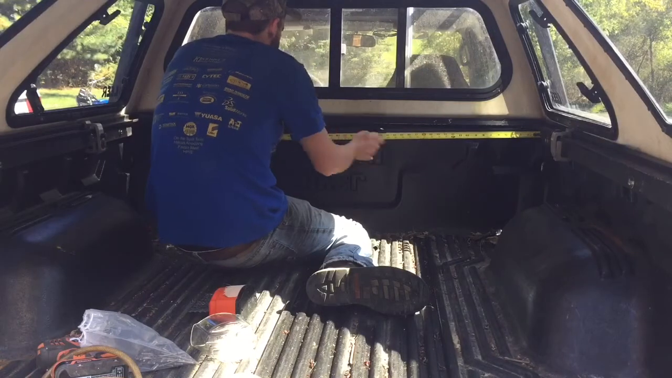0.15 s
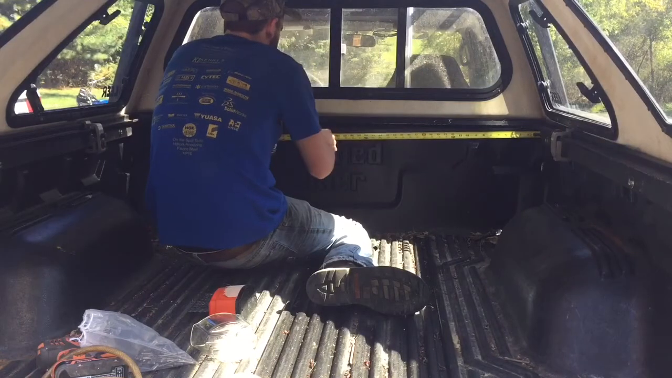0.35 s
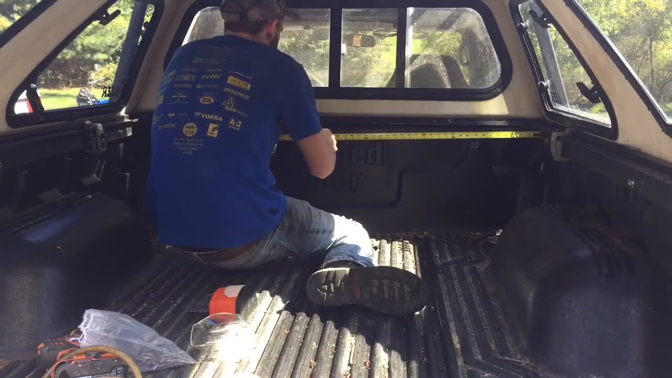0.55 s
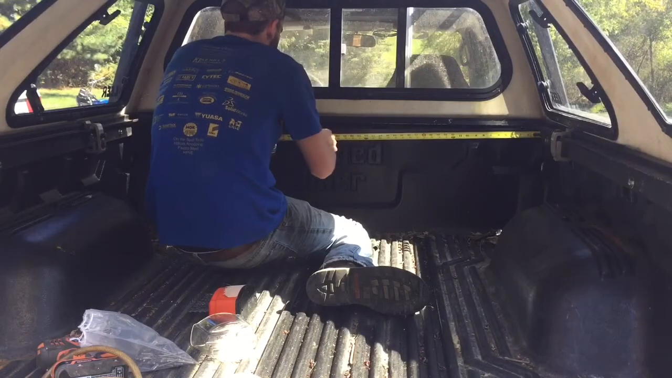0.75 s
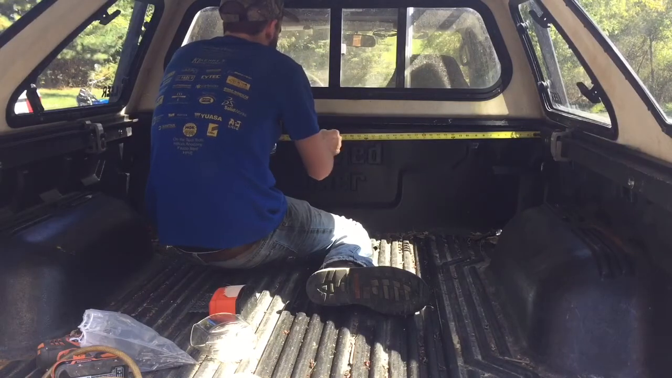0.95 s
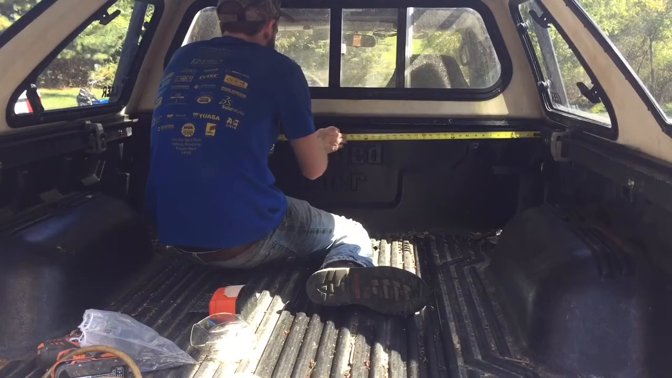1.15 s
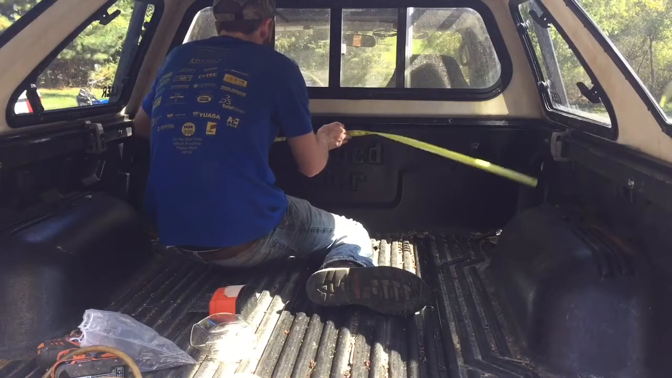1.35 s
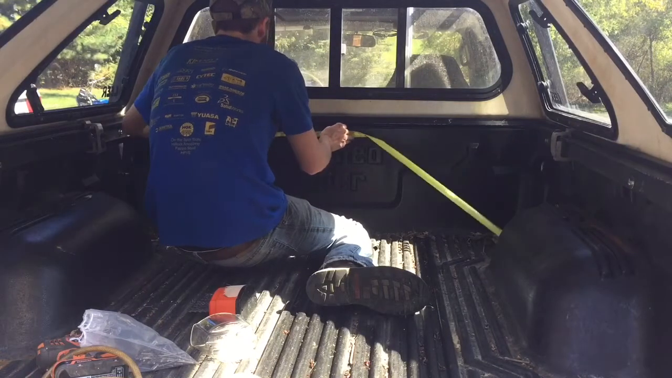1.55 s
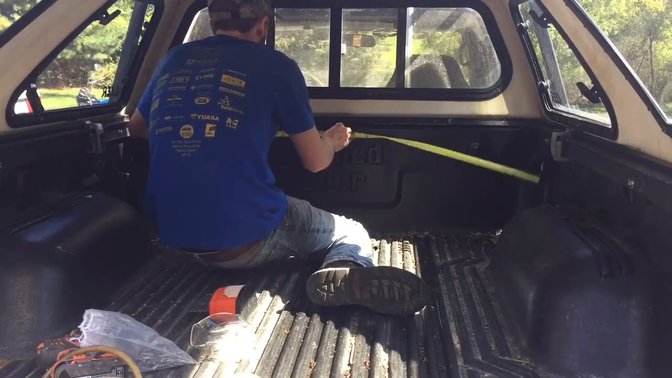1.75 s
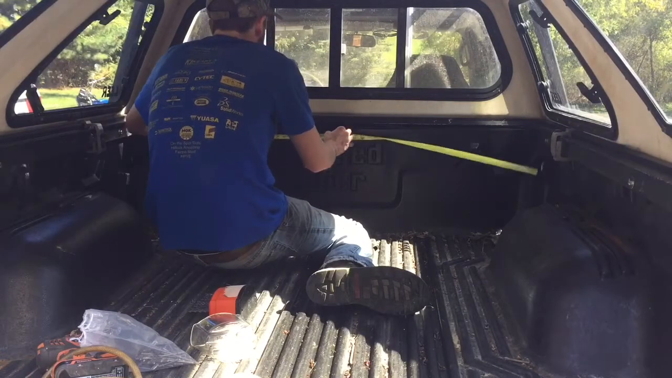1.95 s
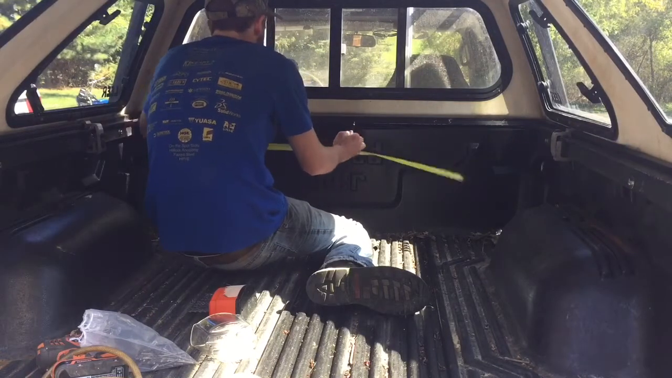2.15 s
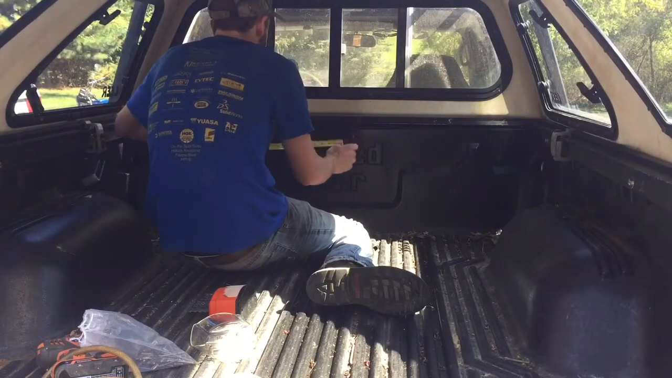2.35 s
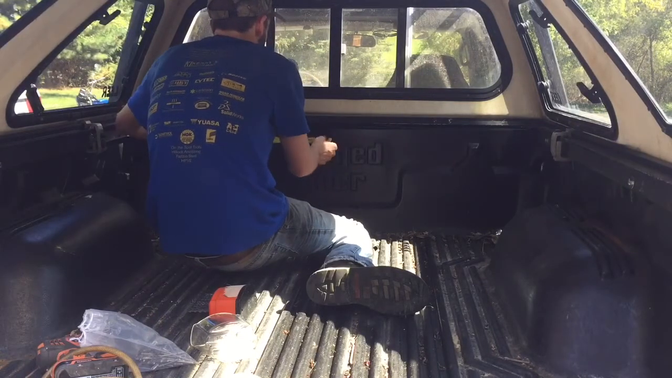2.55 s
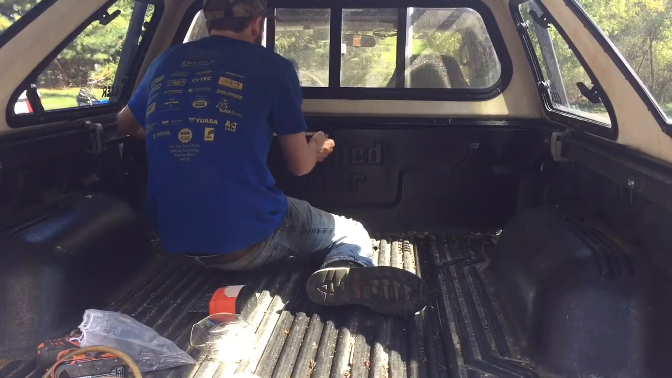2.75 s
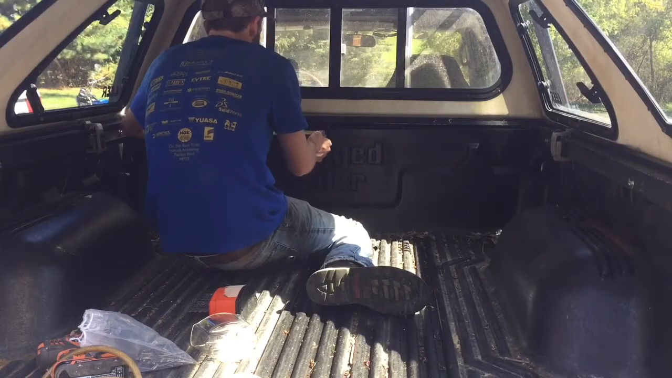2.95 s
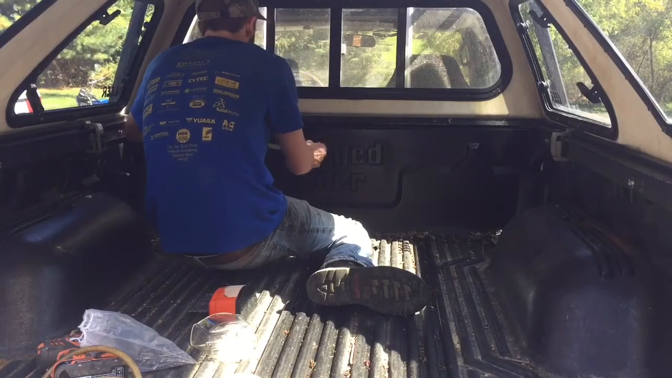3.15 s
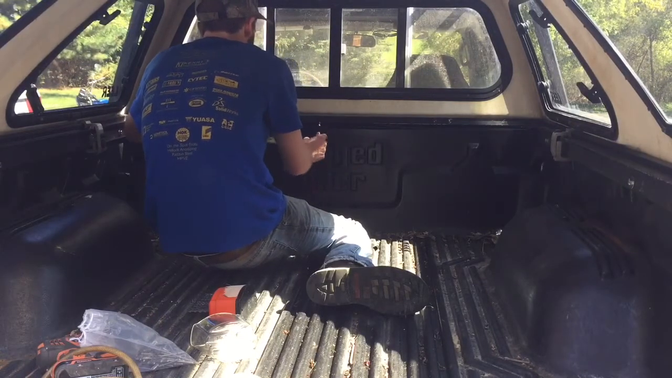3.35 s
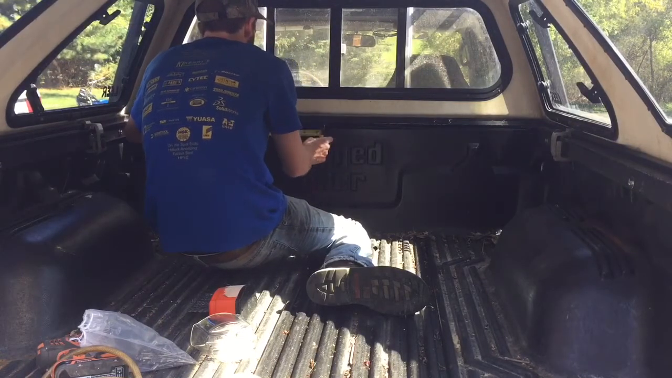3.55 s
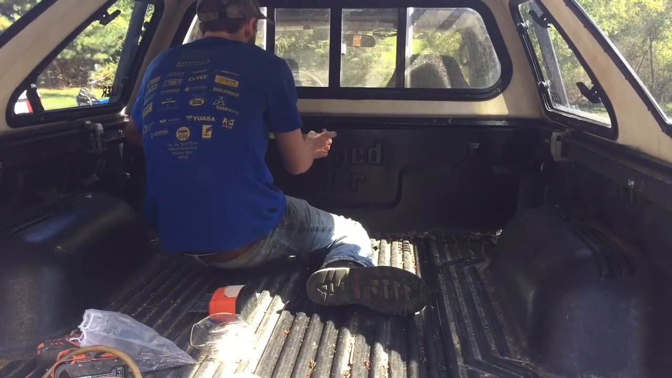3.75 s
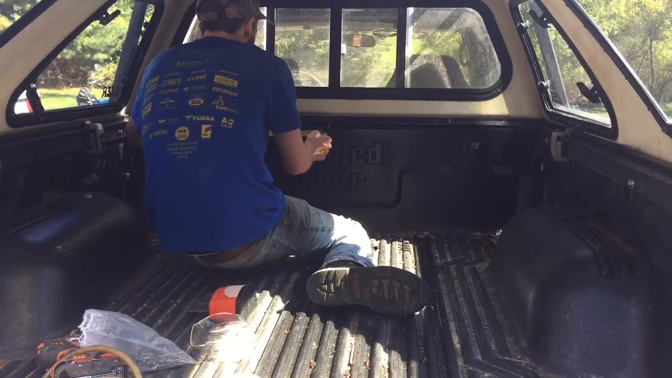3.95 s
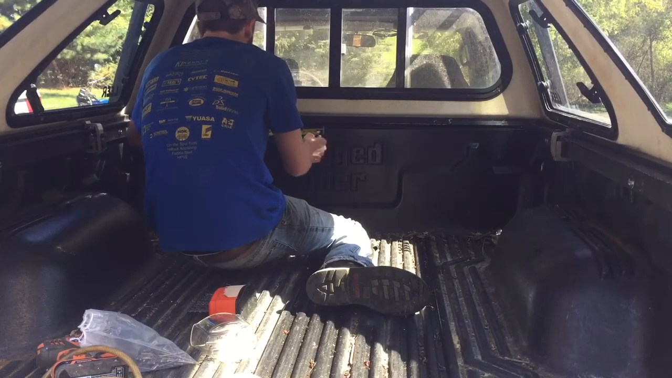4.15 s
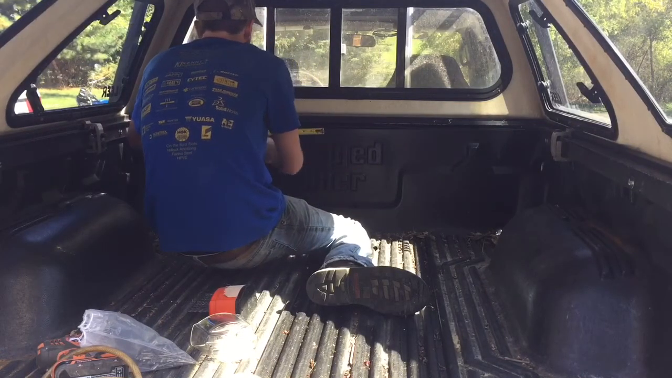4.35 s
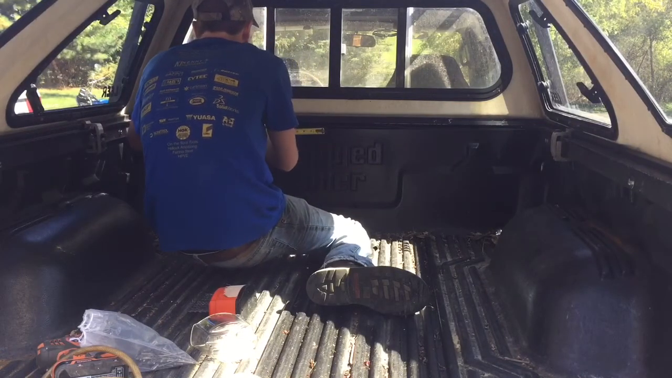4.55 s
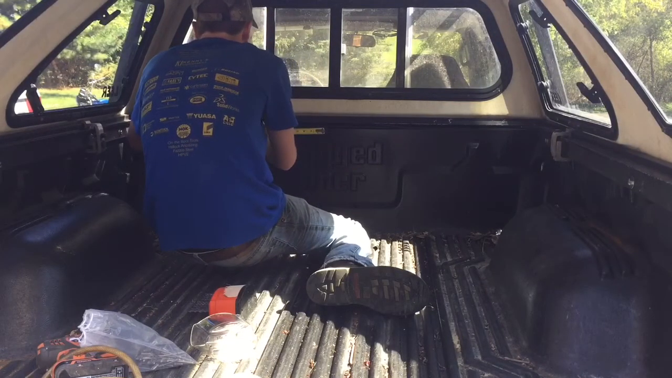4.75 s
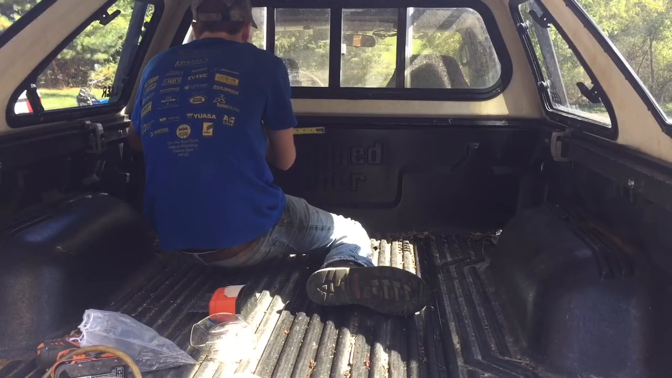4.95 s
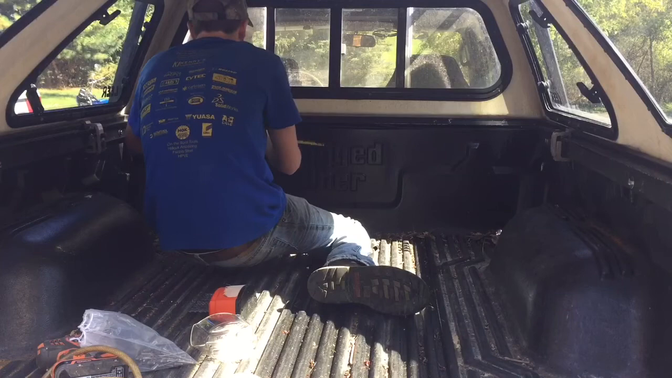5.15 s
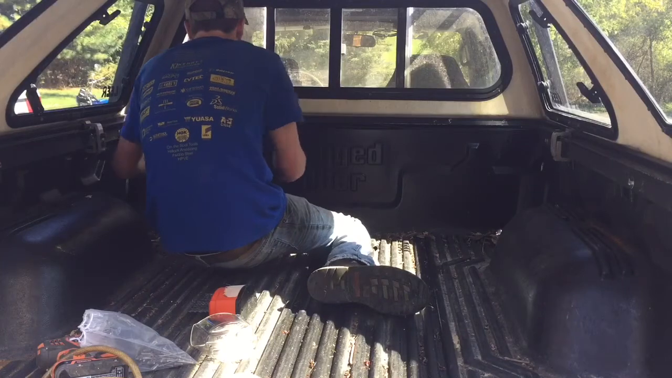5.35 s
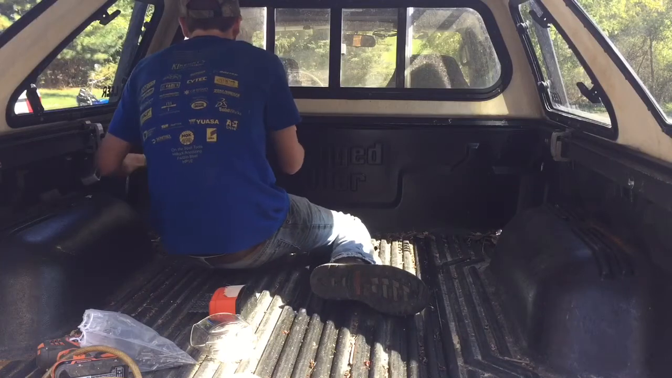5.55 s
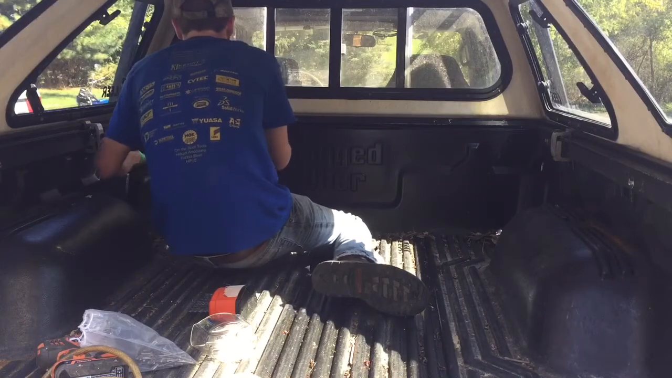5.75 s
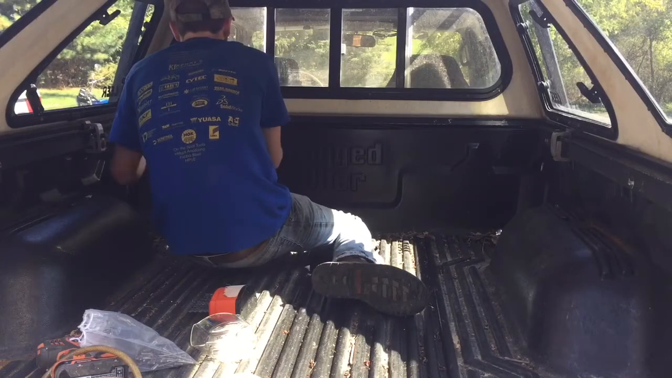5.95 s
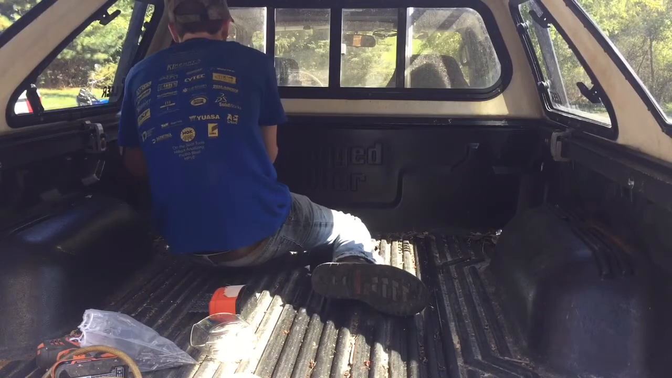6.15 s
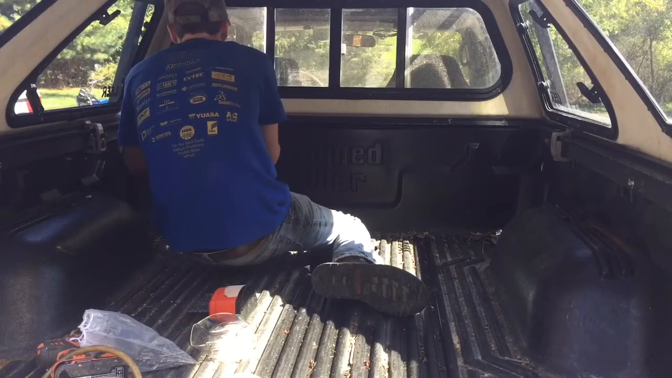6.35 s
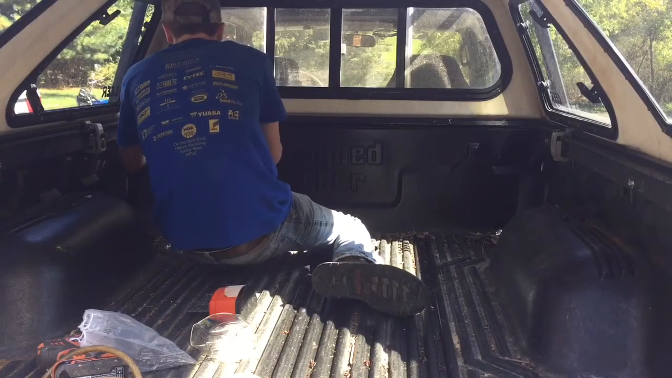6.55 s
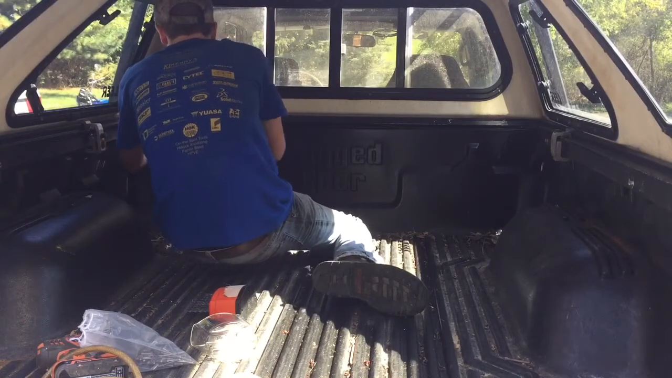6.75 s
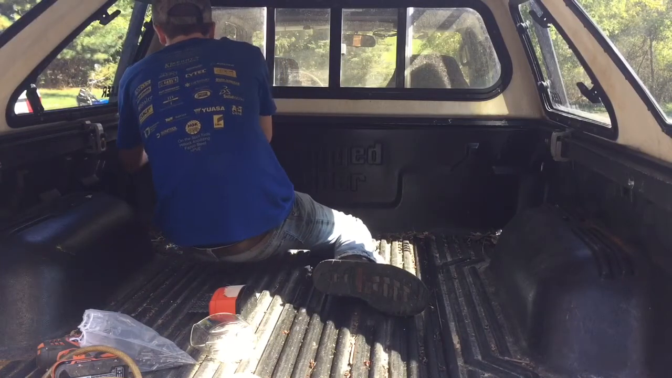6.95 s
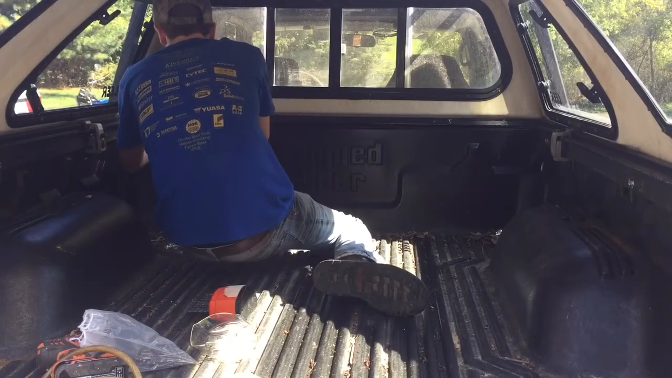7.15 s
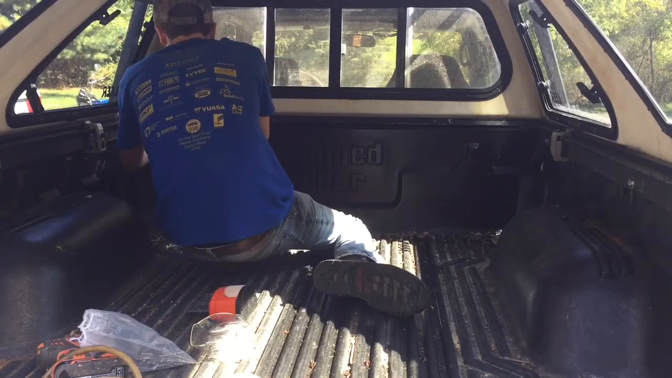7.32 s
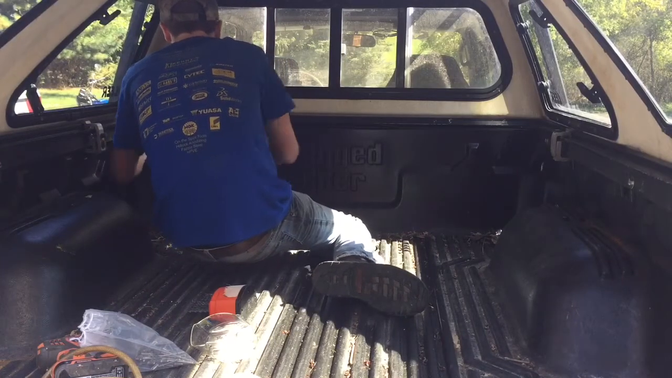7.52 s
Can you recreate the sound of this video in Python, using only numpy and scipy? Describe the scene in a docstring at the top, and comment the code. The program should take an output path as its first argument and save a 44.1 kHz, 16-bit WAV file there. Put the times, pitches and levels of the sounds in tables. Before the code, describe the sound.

In a small enclosed space, a metal tape measure slides in, clattering against plastic, snaps shut and is set down.

```python
"""Faint rubs and knocks over outdoor noise: under the canopy of a pickup bed, a steel tape measure is
unhooked. Its spring draws the blade in with a friction hiss, and the hook clacks on the plastic liner.
Fed in by hand, the blade knocks and scrapes until the hook snaps home and shakes the coil; then the case
is set down. These contacts excite resonances of blade, case and canopy, while the hand holding the
microphone adds soft low bumps."""
import sys
import numpy as np
from scipy import signal
from scipy.io import wavfile

SR = 44100
rng = np.random.default_rng(int(sys.argv[2]) if len(sys.argv) > 2 else 0)


def materialize(psi):
    """Save the field psi as 16-bit PCM at rate SR to the path in sys.argv[1].

    A 1-D psi becomes a single channel; in a 2-D psi each row is a channel.
    """
    bounded = np.clip(np.atleast_2d(psi).T, -1, 1)
    quanta = np.round(bounded * 32767).astype(np.int16)
    wavfile.write(sys.argv[1], SR, quanta)


N = 334542
TIME = np.arange(N) / SR
EDGES = np.geomspace(25, 17500, 27)   # band edges [Hz]
CENTRES = np.sqrt(EDGES[1:] * EDGES[:-1])

# dull knocks of blade and hands: (time [s], contact [s], level [dB], treble [dB], spot pitch [Hz])
KNOCKS = [(0.066, 0.0031, -68.5, -4, 616), (0.785, 0.0013, -61, 16.5, 675),
          (0.823, 0.0041, -62.5, -10, 240), (0.946, 0.0043, -59.5, -24, 840), (1.788, 0.002, -64, 3, 346),
          (1.994, 0.0013, -46.5, -22, 540), (2.197, 0.0005, -26, 9.5, 1846), (2.522, 0.0012, -23, 3, 1302),
          (2.613, 0.0022, -32.5, -4.5, 1260), (2.713, 0.0047, -29.5, -3.5, 630),
          (2.788, 0.004, -47, -14, 686), (2.82, 0.0086, -33, -11, 650), (2.917, 0.0051, -32.5, -4.5, 620),
          (3.068, 0.0019, -25, 2.5, 680), (3.148, 0.0094, -34, -14, 593), (3.17, 0.00068, -26, 4.5, 1263),
          (3.23, 0.0012, -26, 4, 463), (3.34, 0.0015, -28, -19.5, 587), (3.375, 0.0004, -34.5, -15.5, 584),
          (3.444, 0.006, -30.5, -18, 570), (3.495, 0.003, -23, 5.5, 617), (3.546, 0.0041, -29.5, -6.5, 917),
          (3.579, 0.0016, -27, -0.5, 574), (3.638, 0.0048, -34, -6.5, 914), (3.894, .001, -36.5, -1.5, 646),
          (3.986, 0.015, -43.5, -8.5, 1986), (4.16, 0.0032, -32.5, 1, 558), (4.92, 0.0043, -42.5, 2, 510),
          (4.966, 0.0028, -37.5, -3.5, 485), (5.036, 0.0032, -40.5, -2.5, 454),
          (5.239, 0.0031, -29, -11.5, 2035), (5.272, 0.0028, -40, -8, 1370), (5.298, 0.0017, -28, 2, 2040),
          (5.301, 0.0027, -30, -14, 638), (6.125, 0.0036, -38, -1, 2860), (6.357, 0.0046, -55, 1.5, 1030),
          (6.51, 0.0041, -66.5, -9.5, 907), (7.194, 0.0027, -63.5, 16, 655)]
# spectrum of a steel contact: (frequency [Hz], density [dB])
CLICK_SPECTRUM = [(110, -18.5), (250, -17), (600, -18.5), (1300, -11), (2000, -6.5), (2900, -7), (4600, 1),
                  (7000, 0.5), (10000, -0.5), (15500, -4.5)]
# spectrum of sliding friction: (frequency [Hz], density [dB])
SLIDE_SPECTRUM = [(110, -9.5), (220, -5), (350, 4), (550, -3), (900, 2.5), (1300, -6.5), (2200, -3.5),
                  (4500, -4.5), (8000, -14), (12000, -14.5), (15500, -16.5)]
# reverberation under the canopy: (frequency [Hz], T60 [s])
CANOPY_T60 = [(200, 0.24), (600, 0.18), (1500, 0.14), (4000, 0.087), (9000, 0.07), (16000, 0.081)]


def from_db(db):
    """Amplitude ratio of a level in decibels."""
    return 10 ** (np.asarray(db) / 20)


def rms_one(x):
    """Normalisation of each row to unit power."""
    return x / np.sqrt(np.mean(x ** 2, axis=-1, keepdims=True) + 1e-20)


def at_bands(points):
    """Interpolation over log frequency at the band centres, as a column."""
    hz, value = np.transpose(points)
    return np.interp(np.log(CENTRES), np.log(hz), value)[:, None]


def split(pair):
    """Filter bank of unit-power bands; two signals alternate, so neighbours are uncorrelated."""
    bank = [signal.butter(2, edges, "band", fs=SR, output="sos") for edges in zip(EDGES, EDGES[1:])]
    return rms_one(np.array([signal.sosfilt(band, pair[k % 2]) for k, band in enumerate(bank)]))


def colour(spectrum, bass_db=0, treble_db=0):
    """Spectral shaping: band gains of unit total power, then shelved at both ends."""
    gain = from_db(at_bands(spectrum)) * np.sqrt(np.diff(EDGES))[:, None]
    shelves = at_bands([(700, bass_db), (1500, 0), (3500, 0), (8000, treble_db)])
    return gain / np.linalg.norm(gain) * from_db(shelves)


def resonate(x, modes):
    """Resonance: each mode scales its own narrow band."""
    for hz, width_hz, db in modes:
        b, a = signal.iirpeak(hz, hz / width_hz, fs=SR)
        x = signal.lfilter(a + (from_db(db) - 1) * b, a, x)
    return x


def add(out, start_s, sound):
    """Superposition of a sound from a given time on."""
    i = max(0, round(start_s * SR))
    out[i:i + len(sound)] += sound[:N - i]


def stroke(middle_s, half_s):
    """Envelope of a hand movement: the samples it covers and its rounded swell."""
    near = np.flatnonzero(np.abs(TIME - middle_s) < 2 * half_s)
    return near, np.exp(-.5 * ((TIME[near] - middle_s) / half_s) ** 4)


def outdoors(level_db):
    """Stationary background noise: distant rumble and thin hiss."""
    # outdoor spectrum: (frequency [Hz], density [dB])
    spectrum = [(30, -46.5), (58, -24), (81, 3.5), (153, 1), (227, 1.5), (273, -7.5), (374, -2), (526, -9),
                (666, -6.5), (1130, -16.5), (1280, -11), (4650, -20.5), (14800, -26), (16000, -26)]
    # steady bands of hiss: (frequency [Hz], width [Hz], gain [dB])
    hiss_bands = [(5503, 150, 6), (13170, 1100, 4.5)]
    air = (split(rng.standard_normal((2, N))) * colour(spectrum)).sum(0)
    return from_db(level_db) * resonate(air, hiss_bands)


def rubbing(width_octaves, sink_octaves):
    """Friction noise in one broad resonance, which sinks as the hand slows."""
    # rubs of hands and cloth: (middle [s], half length [s], resonance [Hz], level [dB])
    rubs = [(0.013, 0.028, 1100, -63), (0.142, 0.022, 600, -63), (1.07, 0.015, 653, -54),
            (1.094, 0.031, 295, -52), (1.367, 0.076, 270, -56.5), (2.364, 0.038, 346, -58),
            (4.217, 0.033, 193, -50.5), (5.346, 0.016, 1200, -36.5), (5.375, 0.061, 282, -48.5),
            (6.265, 0.032, 544, -49.5), (6.315, 0.029, 250, -60.5), (7.409, 0.054, 850, -71)]
    out, noise = np.zeros(N), split(rng.standard_normal((2, N)))
    for s, half_s, middle_hz, db in rubs:
        near, swell = stroke(s, half_s)
        hz = middle_hz * 2 ** (sink_octaves * np.interp(TIME[near], [s - half_s, s + half_s], [.5, -.5]))
        gain = 1 / (1 + (np.log2(CENTRES[:, None] / hz) / width_octaves) ** 4)
        out[near] += from_db(db) * swell * rms_one((noise[:, near] * gain).sum(0))
    return out


def impacts(rows, spectrum, crack_t60, early_db, late_db, late_t60, rise_power=0.7):
    """Impact noise: a brief crack, near reflections and a faint late ring decay exponentially."""
    out, t = np.zeros(N), TIME[:SR // 4]
    noise = split(rng.standard_normal((2, N // 2)))
    crack = from_db(-60 * t / crack_t60)
    early = from_db(early_db - 60 * t / at_bands(CANOPY_T60))
    late = from_db(late_db - 60 * t / late_t60)
    decay = np.sqrt(crack ** 2 + early ** 2 + late ** 2)
    offsets = rng.integers(0, N // 2 - len(t), len(rows))
    for (s, contact_s, db, bass_db, treble_db), i in zip(rows, offsets):
        since_contact = (np.maximum(t - contact_s, 0) * SR).astype(int)
        force = np.minimum(t / contact_s, 1) ** rise_power   # a hard contact builds up at once
        bands = noise[:, i:i + len(t)] * decay.take(since_contact, axis=1)
        add(out, s, from_db(db) * force * (colour(spectrum, bass_db, treble_db)[:, 0] @ bands))
    return out


def free_length(s):
    """Metres of blade free to vibrate at a given time."""
    # blade out of the case: (time [s], length [m])
    blade_out = [(1.9, 2.03), (2.3, 0.3), (2.85, 1.82), (3.05, 0.12), (5.4, 0.48)]
    return np.interp(s, *np.transpose(blade_out))


def contact_bass(s, db, db_per_m=5.5, firm_db=-30):
    """Bass shelf in dB: a long free blade and a light touch both favour low frequencies."""
    return db_per_m * free_length(s) + 0.1761 * (firm_db - db)


def with_bass(rows, bass_db):
    """Impacts on the blade, each with the bass that free length and force give it."""
    return [(s, contact_s, db, bass_db + contact_bass(s, db), treble_db)
            for s, contact_s, db, treble_db, *_ in rows]


def blade_knocks():
    """Damped impacts of the flexing blade and the hands, with their chatter."""
    # spectrum of a dull contact: (frequency [Hz], density [dB])
    spectrum = [(110, -29), (220, -13), (350, -9.5), (550, -5.5), (900, -1.5), (1300, -4.5), (2200, -2),
                (4500, -5.5), (7000, -10.5), (11000, -13.5), (15500, -20.5)]
    touches = with_bass(KNOCKS + chatter(), bass_db=-3.5)
    return impacts(touches, spectrum, crack_t60=0.05, early_db=-4.5, late_db=-19.5, late_t60=0.18)


def spot_rings(gain_db, t60, rise_s):
    """Free vibration of the struck spot gives each knock a short hollow pitch."""
    out, t = np.zeros(N), TIME[:SR // 4]
    for s, contact_s, db, _, hz in KNOCKS:
        swell = np.minimum(t / (contact_s + rise_s), 1)
        decay = from_db(db + gain_db - 60 * (t - contact_s) / t60)
        add(out, s, swell * decay * np.sin(2 * np.pi * hz * t))
    return out


def scrape_power(bass_db=-10, rasp_db=6.5, rasp_octaves=0.49, drag_delay_s=0.039, drag_half_s=0.013):
    """Band power of scraping friction, lifted around one resonance of the bent blade."""
    # scrapes of the hand-fed blade, and of the case as it is put down:
    # (middle [s], half length [s], level [dB], treble [dB], resonance [Hz])
    scrapes = [(1.25, 0.039, -67.5, 10, 800), (2.07, 0.011, -49.5, -8, 616), (2.6, 0.043, -43, -4, 2200),
               (2.644, 0.037, -33.5, -3, 2300), (2.756, 0.021, -47, -28, 627),
               (2.965, 0.021, -58, -33, 620), (3.092, 0.022, -34, -2.5, 1150),
               (3.164, 0.003, -34, -1, 1350), (3.228, 0.0075, -30, -9, 1320),
               (3.39, 0.056, -50.5, -12, 620), (3.603, 0.0086, -28, -5, 634),
               (3.675, 0.025, -38.5, -2.5, 2080), (3.823, 0.0052, -35, -12.5, 2080),
               (3.869, 0.014, -30.5, -4.5, 750), (4.089, 0.0081, -41, -17, 656),
               (4.336, 0.0064, -52.5, -19, 1100), (5.203, 0.028, -39.5, -5.5, 660),
               (5.335, 0.0067, -29.5, -3, 1280), (6.25, 0.028, -57.5, -7.5, 1290),
               (6.345, 0.013, -60, 0, 1700), (7.56, 0.029, -38, -5, 550)]
    # after each knock the blade drags on, weaker and duller
    drags = [(s + drag_delay_s, drag_half_s, db - 31.5, treble_db - 11, hz)
             for s, _, db, treble_db, hz in KNOCKS]
    power = np.zeros((len(CENTRES), N))
    for s, half_s, db, treble_db, hz in scrapes + drags:
        near, swell = stroke(s, half_s)
        peak = np.exp(-.5 * (np.log2(CENTRES[:, None] / hz) / rasp_octaves) ** 2)
        tone = colour(SLIDE_SPECTRUM, bass_db + contact_bass(s, db), treble_db)
        power[:, near] += (from_db(db + rasp_db * (peak - .5)) * swell * tone) ** 2
    return power


def flutter(per_s, depth_db, hold=16):
    """Random amplitude modulation, band by band: as the blade flexes, different bands speak."""
    knots = from_db(depth_db * rng.standard_normal((len(CENTRES), N // 200)))
    gains = rms_one(np.array([np.interp(TIME[::hold] * per_s, np.arange(len(k)), k) for k in knots]))
    return np.repeat(gains, hold, axis=1)[:, :N]


def catches(per_s, depth_db):
    """Stick-slip modulation: the blade holds and lets go, in all bands at once."""
    knots = from_db(depth_db * np.clip(rng.standard_normal(N // 50), -2, 2))
    return rms_one(np.interp(TIME * per_s, np.arange(len(knots)), knots))


def sliding(slips_per_s, spread_db, snags_per_s, snag_db, gain_db):
    """Stick-slip friction in fingers and case mouth: tiny slips, and sharp ticks as the edge snags."""
    sizes = from_db(spread_db * np.minimum(rng.exponential(1, (2, N)), 4)) * rng.choice([-1, 1], (2, N))
    snags = from_db(snag_db) * rms_one(rng.uniform(-1, 1, N) * (rng.random(N) < snags_per_s / SR))
    slips = rms_one(sizes * (rng.random((2, N)) < slips_per_s / SR))
    friction = split(snags + slips) * flutter(per_s=70, depth_db=1.5) * catches(per_s=220, depth_db=4)
    return from_db(gain_db) * (friction * np.sqrt(scrape_power() + retraction_power())).sum(0)


def canopy_echo(dry):
    """Reverberation of the small enclosure, mixed equally with the direct sound; bass lasts longest."""
    t = TIME[:SR // 3]
    bands = split(rng.standard_normal((2, len(t)))) * from_db(-60 * t / at_bands(CANOPY_T60))
    tail = (rms_one(bands) * np.sqrt(np.diff(EDGES))[:, None]).sum(0)
    wet = signal.fftconvolve(dry, tail / np.linalg.norm(tail))[:N]
    return (dry + wet) / np.sqrt(2)


def hook_clicks():
    """Hard impacts of the steel hook and blade tip give bright, fast-decaying clicks."""
    # steel contacts: (time [s], contact [s], level [dB], treble [dB])
    clicks = [(1.052, 0.0049, -55.5, -2.5), (1.292, 0.0068, -33, 6.5), (1.3235, 0.004, -30.5, -1.5),
              (1.391, 0.0036, -39, -6), (2.381, 0.0022, -54, 17), (2.4, 0.0018, -53, 16.5),
              (2.487, 0.011, -60.5, 14), (5.431, 0.0073, -23.5, -4.5), (5.896, .002, -63, 10.5)]
    touches = with_bass(clicks, bass_db=-2)
    return impacts(touches, CLICK_SPECTRUM, crack_t60=0.02, early_db=1, late_db=-30.5, late_t60=0.43)


def retraction_power(gain_db=-7.5, edge_s=0.0091, middling_db=-44.5):
    """Band power of friction as the spring pulls the blade in: fast runs are louder, slow ones rumble."""
    # free runs, with speed given as the level of the hiss: (bass [dB], [(time [s], level [dB])])
    runs = [ (2, [(1.305, -36.5), (1.335, -38), (1.398, -51), (1.42, -62.5), (1.485, -57)]),
            (-10.5, [(1.515, -59), (1.545, -63), (1.558, -48), (1.578, -47), (1.625, -54.5)]),
            (-2, [(1.965, -64), (2.0, -57.5), (2.11, -53), (2.13, -40.5), (2.162, -30.5), (2.19, -45),
            (2.25, -47.5)]), (-9.5, [(2.32, -47.5), (2.37, -52.5), (2.435, -56.5)]), ]
    power = np.zeros((len(CENTRES), N))
    for bass_db, run in runs:
        s, db = np.transpose(run)
        gate = np.interp(TIME, [s[0] - edge_s, s[0], s[-1], s[-1] + edge_s], [0, 1, 1, 0])
        near = np.flatnonzero(gate)
        speed_db = np.interp(TIME[near], s, db)
        rumble_db = at_bands([(700, 0.34), (1500, 0)]) * (middling_db - speed_db)
        tone = colour(SLIDE_SPECTRUM, bass_db + 4, treble_db=16.5)
        power[:, near] += (gate[near] * from_db(gain_db + speed_db + rumble_db) * tone) ** 2
    return power


def chatter(count=2, gap_s=0.027, contact_s=0.001294, slack_from_s=1.3):
    """Uneven, weaker rebounds of the slack blade after a knock; a longer blade loses less at each."""
    rows = []
    for (s, _, db, treble_db, _), gaps in zip(KNOCKS, rng.uniform(0.39, 1.2, (len(KNOCKS), count))):
        loss_db = 26 - 9.5 * free_length(s)
        if s > slack_from_s:   # the blade is taut until it is unhooked
            rows += [(s + gap_s * elapsed, contact_s, db - k * loss_db, treble_db - 1)
                     for k, elapsed in enumerate(np.cumsum(gaps), 1)]
    return rows


def canopy_booms(hz, rise_s):
    """The lowest mode of the canopy swells and fades as the swaying blade leans on the liner."""
    # sways of the blade: (time [s], peak level [dB])
    sways = [(2.131, -50.5), (2.291, -46.5), (2.53, -46), (2.74, -54), (3.149, -51), (3.63, -44),
             (3.91, -52)]
    out, t = np.zeros(N), TIME[:SR // 3]
    age = t / rise_s
    for s, db in sways:
        add(out, s, from_db(db) * (age * np.exp(1 - age)) ** 2 * np.sin(2 * np.pi * hz * t))
    return out


def hook_slams():
    """The hook whips against the bed liner and bounces once; the impacts excite the liner's modes."""
    # landing and bounce: (time [s], contact [s], level [dB], treble [dB])
    slams = [(2.258, .0024, -9.5, -3.5), (2.2795, 0.001, -17, -5.5)]
    # modes of the liner: (frequency [Hz], width [Hz], gain [dB])
    liner_modes = [(934, 40, 7), (1386, 130, 8.5)]
    cracks = impacts(with_bass(slams, bass_db=0), CLICK_SPECTRUM,
                     crack_t60=0.01, early_db=-2, late_db=-32, late_t60=0.3, rise_power=0.1)
    return resonate(cracks, liner_modes)


def grip_bumps(count=10, jitter=0.21, hz=124.5, spread_octaves=0.2, spread_db=2.5):
    """A shifting grip makes a pulse train of uneven timing, pitch and strength."""
    # shifts of the grip on the microphone: (start [s], end [s], level [dB])
    shifts = [(4.566, 4.653, -53), (4.691, 4.779, -44.5), (6.757, 6.963, -45), (7.146, 7.248, -51.5)]
    rows = []
    for start_s, end_s, db in shifts:
        step_s = (end_s - start_s) / count
        for k, (late, high, loud) in enumerate(rng.standard_normal((count, 3))):
            s = start_s + step_s * (k + jitter * late)
            rows.append((s, hz * 2 ** (spread_octaves * high), db + spread_db * loud))
    return rows


def microphone_bumps(rise_s):
    """Structure-borne sound: each push on the housing gives a few low cycles, sinking in pitch."""
    # firm bumps: (time [s], mid-glide pitch [Hz], peak level [dB])
    firm_bumps = [(4.235, 143.4, -39), (4.606, 161.4, -36.5), (4.742, 120.6, -34.5), (4.926, 209, -35),
                  (4.945, 115, -36), (5.19, 106.6, -38.5), (5.752, 121, -39.5), (5.641, 155.6, -42),
                  (5.715, 110, -38), (5.808, 121, -42.5), (6.698, 112.8, -39), (6.739, 148.4, -38),
                  (7.276, 135.7, -37), (7.31, 118, -40)]
    out, age = np.zeros(N), TIME[:SR // 8] / rise_s
    for s, hz, db in firm_bumps + grip_bumps():
        phase = 2 * np.pi * np.cumsum(hz * (.5 + np.exp(-age / 2))) / SR
        add(out, s, from_db(db) * (age * np.exp(1 - age)) ** 2 * np.sin(phase))
    return out


def hook_snap(start_s, level_db, count=4, contact_s=0.00033, rebound_s=0.0705, coil_s=0.036):
    """Inelastic impact: the hook hits the case and rebounds, sooner and weaker, as the coil shakes."""
    # spectrum of the snap: (frequency [Hz], density [dB])
    spectrum = [(110, -22.5), (250, -13.5), (500, -16), (900, -9), (1350, -10.5), (2000, 0.5), (3600, -2),
                (5500, -3), (9000, -4), (15500, -7)]
    k = np.arange(1, count)
    # the first hit, the hook's rebounds, the coil's touches
    delays_s = np.r_[0, np.cumsum(rebound_s * 0.9 ** (k - 1)), coil_s * k]
    losses_db = np.r_[0, 11.5 * k ** 1.62, 12.5 * k]
    bass_db, treble_db = -3, 1
    hits = [(start_s + delay, contact_s, level_db - loss, bass_db, treble_db)
            for delay, loss in zip(delays_s, losses_db)]
    return impacts(hits, spectrum, crack_t60=0.044, early_db=-4.5, late_db=-31, late_t60=0.38)


def coil_shiver(start_s, level_db, t60, band_hz):
    """Damped rattle: the turns of the coil buzz against each other and settle."""
    out, t = np.zeros(N), TIME[:SR // 2]
    band = signal.butter(2, band_hz, "band", fs=SR, output="sos")
    buzz = rms_one(signal.sosfilt(band, rng.standard_normal(len(t))))
    add(out, start_s, from_db(level_db - 60 * t / t60) * buzz)
    return out


def case_set_down():
    """The impact of the case on the bed excites its hollow ring."""
    # the landing: (time [s], contact [s], level [dB], bass [dB], treble [dB])
    landing = [(7.525, 0.0032, -26, -4.5, 5.5)]
    # its spectrum: (frequency [Hz], density [dB])
    spectrum = [(110, 0.5), (320, 1.5), (950, -16), (1350, 8.5), (2200, -4.5), (5000, 2.5), (7000, -6),
                (15500, -10.5)]
    # its ring: (frequency [Hz], width [Hz], gain [dB])
    hollow_modes = [(1350, 50, 4), (2800, 60, 10)]
    knock = impacts(landing, spectrum, crack_t60=0.013, early_db=-0.5, late_db=-46, late_t60=0.25)
    return resonate(knock, hollow_modes)


def scene():
    """Source and filter: contacts pass through the modes of blade or case, then those of the canopy."""
    # modes of steel blade, case, and liner with canopy: (frequency [Hz], width [Hz], gain [dB])
    blade_modes = [(3784, 35, 3.5), (4990, 70, 5), (6280, 18, 1.5), (8043, 60, 3), (8840, 180, 6.5)]
    case_modes = [(1330, 56.6, 1.5), (1744, 87, 9.5), (2474, 88, 7), (3280, 56, 12.5), (4230, 60, 5),
                  (8030, 60, 3.5)]
    canopy_modes = [(215.7, 3.4, 12.5), (231.8, 7, 14.5), (471.7, 25, 13), (619, 41, 11.5), (692, 31, 7),
                    (868, 45, 7), (1259, 80, 8), (1370, 35, 3), (1720, 170, -3), (1890, 65, 3.5)]
    snap_s = 5.703
    contacts = blade_knocks() + hook_clicks()
    snap = hook_snap(snap_s, level_db=-13.5)
    set_down = case_set_down()
    slides = sliding(slips_per_s=3500, spread_db=4, snags_per_s=220, snag_db=-7, gain_db=1.5)
    blade = resonate(contacts + canopy_echo(slides) + hook_slams(), blade_modes)
    shiver = coil_shiver(snap_s, level_db=-26, t60=0.2, band_hz=(1300, 4500))
    case = resonate(snap + shiver, case_modes) + set_down
    bass_cut = signal.butter(2, 110, "high", fs=SR, output="sos")   # small parts radiate little bass
    tape = signal.sosfilt(bass_cut, resonate(blade + case, canopy_modes))
    rings = spot_rings(gain_db=-2.5, t60=0.072, rise_s=0.0018) + canopy_booms(hz=214.3, rise_s=0.037)
    handling = microphone_bumps(rise_s=0.0071) + rubbing(width_octaves=0.71, sink_octaves=0.45)
    return (tape + rings + handling + outdoors(level_db=-63))[None]


def record(dry):
    """Band limiting: a steep low-pass removes the highest treble."""
    cutoff_hz = 15900
    return signal.sosfilt(signal.ellip(10, .1, 70, cutoff_hz, fs=SR, output="sos"), dry)


dry = scene()
out = record(dry)
materialize(out)
```